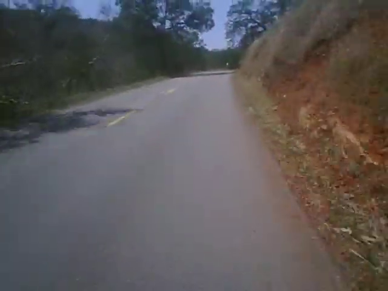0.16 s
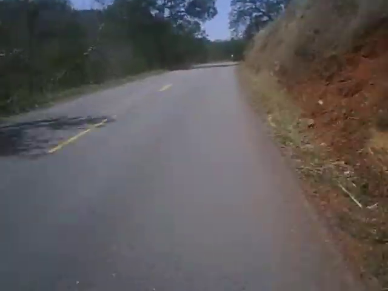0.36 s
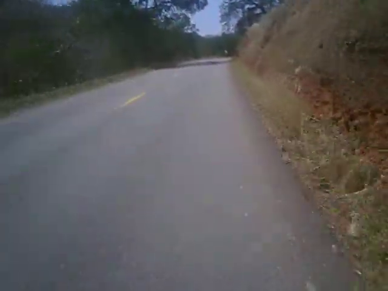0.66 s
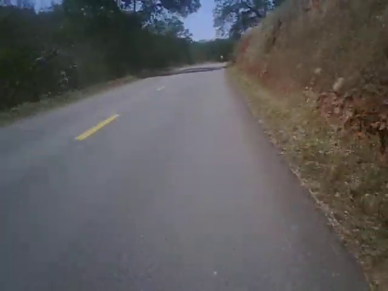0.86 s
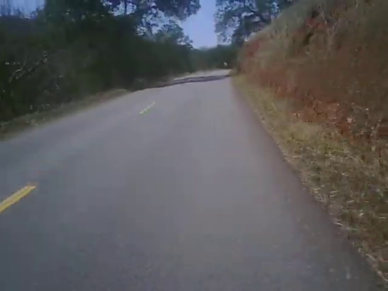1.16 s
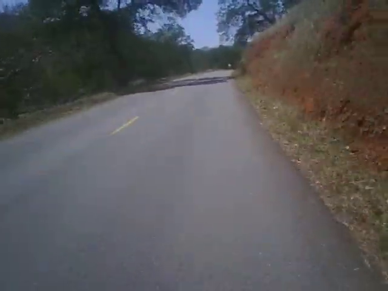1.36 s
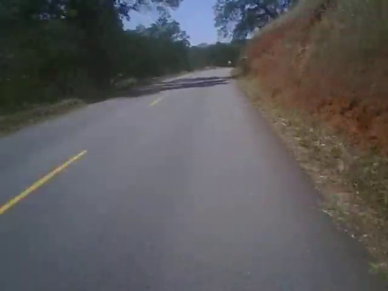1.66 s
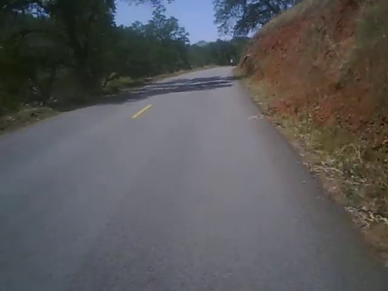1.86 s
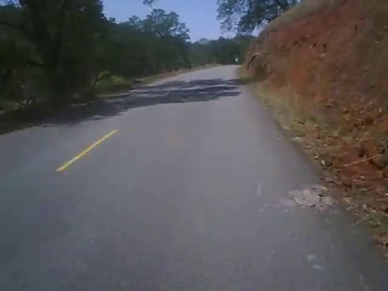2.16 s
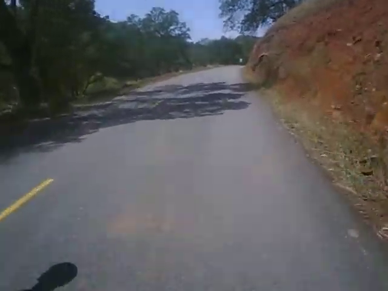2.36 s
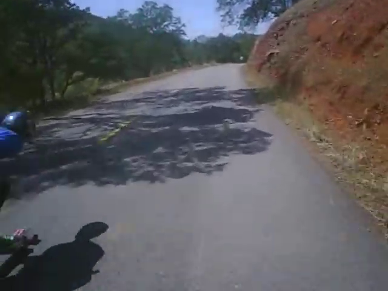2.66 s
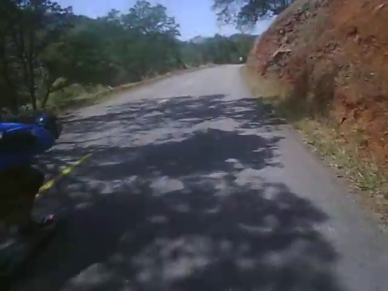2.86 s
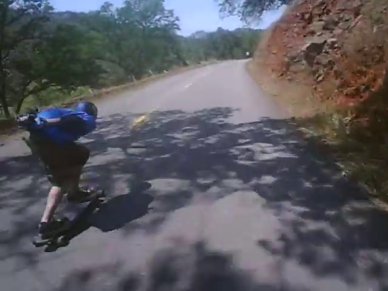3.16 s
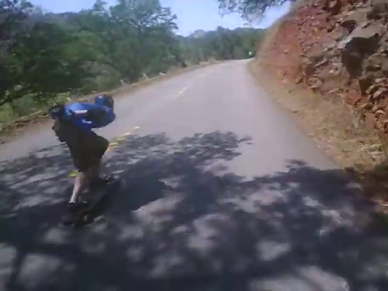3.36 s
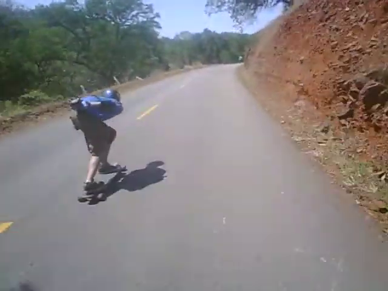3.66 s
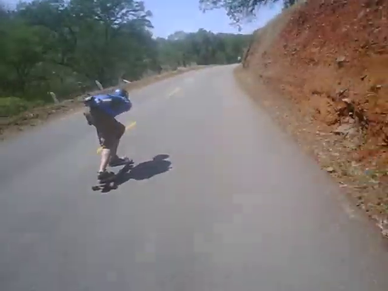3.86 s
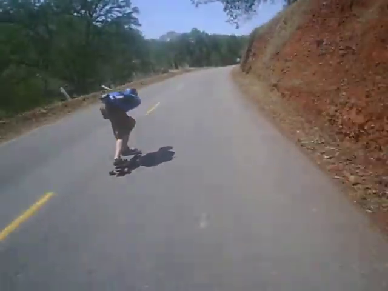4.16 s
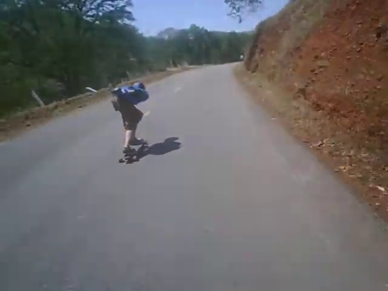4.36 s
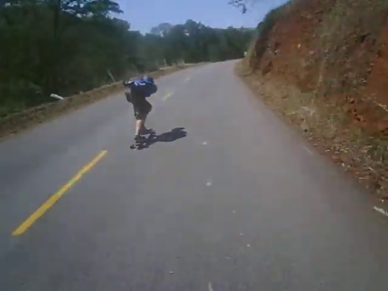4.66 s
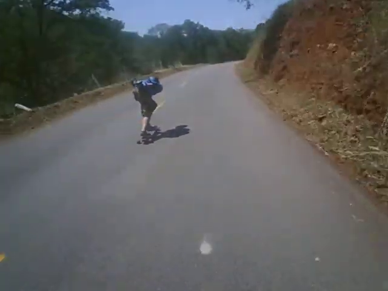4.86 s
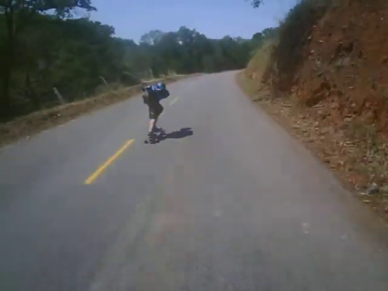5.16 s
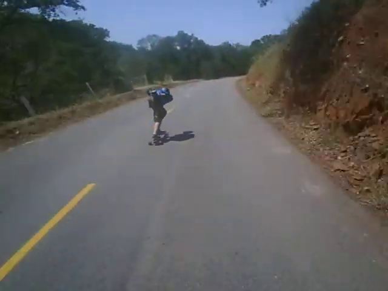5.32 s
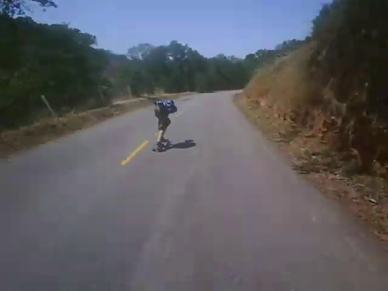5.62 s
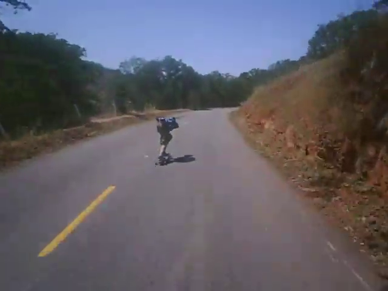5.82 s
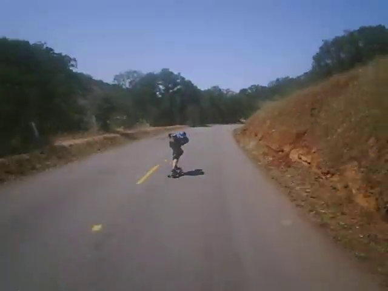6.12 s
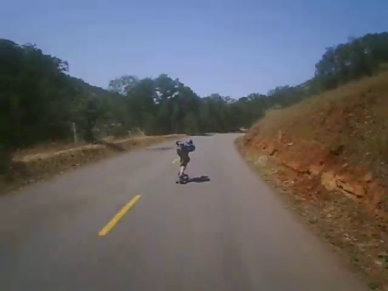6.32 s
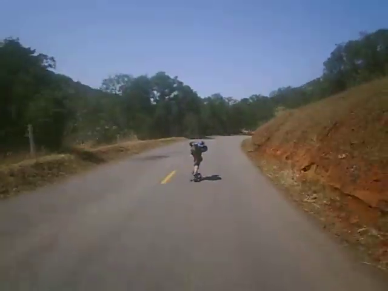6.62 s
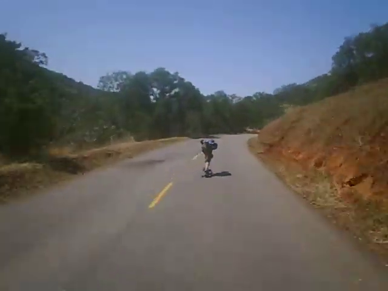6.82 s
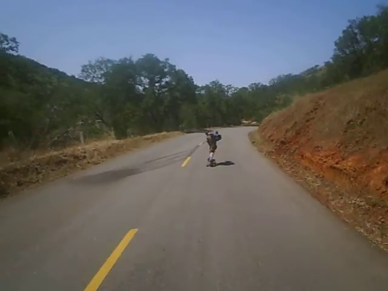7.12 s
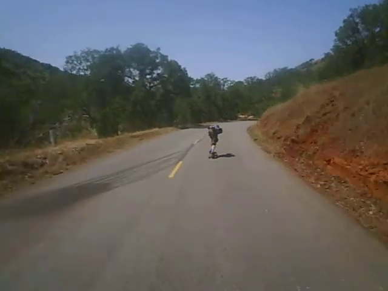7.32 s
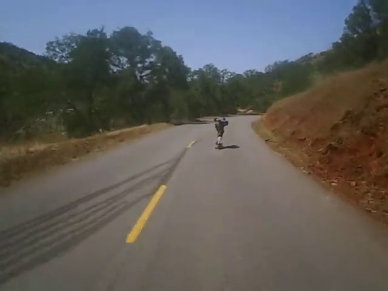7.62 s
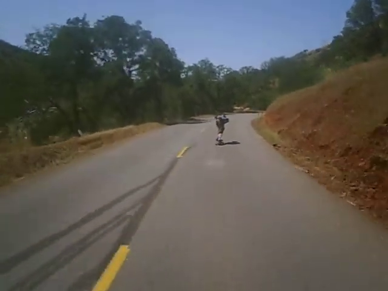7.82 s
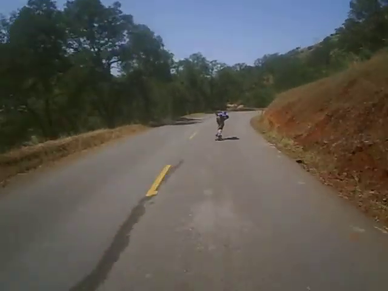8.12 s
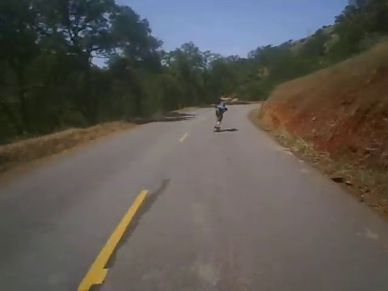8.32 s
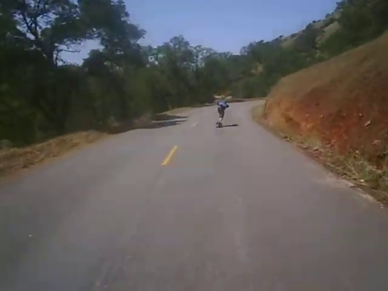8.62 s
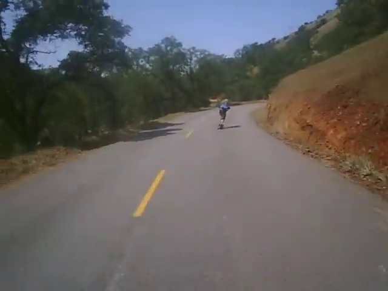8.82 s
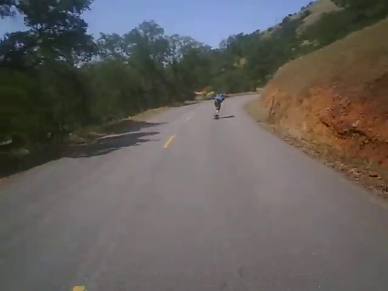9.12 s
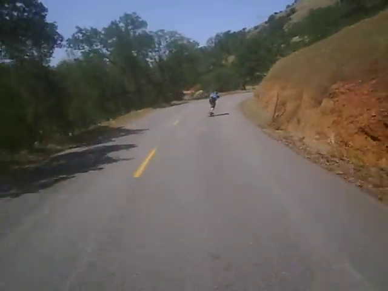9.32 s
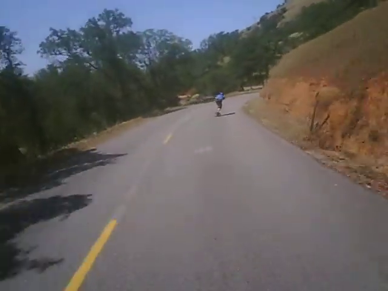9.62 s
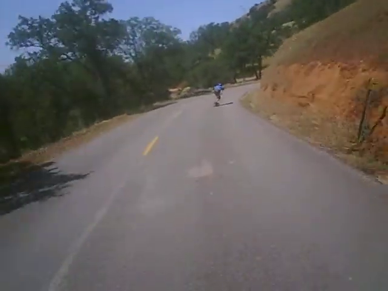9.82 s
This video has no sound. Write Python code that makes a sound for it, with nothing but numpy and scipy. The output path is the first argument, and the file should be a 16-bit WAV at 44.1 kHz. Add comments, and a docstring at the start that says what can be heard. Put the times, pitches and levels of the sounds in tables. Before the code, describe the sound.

Harsh rolling roar of skateboard wheels on a coarse road, wind rumbling underneath, a faint passing hiss, sudden swells, then fading amid electronic ticks.

```python
"""A longboard rolls on rough asphalt, heard by a small camera: stones shake wheels, deck and trucks (shaped noise)
while wind rumbles. The roar swells in the first half second and sinks by 3 s; a second board hisses past at 2.6 s.
The roar leaps at 3.6 s, grit peaks near 6 s, the roar jumps again at 7.7 s, then sinks to the end.
Throughout, the camera adds self-noise, whistles, a frame-rate buzz and ticks at its buffer seams."""
import sys
import numpy as np
from scipy import signal
from scipy.fft import rfft, irfft, next_fast_len
from scipy.io import wavfile
from scipy.ndimage import uniform_filter1d, map_coordinates

SR = 44100
rng = np.random.default_rng(int(sys.argv[2]) if len(sys.argv) > 2 else 0)


def file_out(sig):
    """Save sig as 16-bit WAV at sys.argv[1]."""
    # one column per channel
    cols = np.atleast_2d(sig).T
    # limit, then scale
    lim = np.clip(cols, -1, 1)
    pcm = np.round(lim * 32767).astype(np.int16)
    wavfile.write(sys.argv[1], SR, pcm)


N = 440118

# rolling levels before the fine wobble: (time [s], wheel roar [dB], grit [dB], airy hiss [dB])
RIDE_LEVELS = [(0, -24, -41, -45), (.16, -20, -38, -42), (.33, -17.5, -33.5, -39), (.5, -18, -36, -41),
               (1.05, -18, -34, -40), (1.25, -21.5, -39.5, -43.5), (1.6, -21, -40, -44.5),
               (1.75, -23.5, -42.5, -43.5), (2.6, -25.5, -44.5, -44.5), (3.25, -26.5, -44.5, -47.5),
               (3.56, -21, -39, -42.5), (3.575, -19, -35, -40), (3.68, -16, -33, -39.5),
               (3.85, -17, -32.5, -39), (4.2, -16, -35, -40), (4.7, -18.5, -37.5, -42),
               (5.15, -17.5, -35, -41), (5.3, -20.5, -36.5, -42), (5.5, -17.5, -34, -39.5),
               (5.85, -16, -30, -35.5), (6.45, -15.5, -29.5, -35.5), (6.55, -18, -33, -36),
               (6.75, -17.5, -33.5, -37.5), (7.05, -18.5, -33.5, -40), (7.35, -20, -37.5, -42),
               (7.63, -22, -38, -43), (7.67, -18, -33.5, -37.5), (7.85, -19.5, -38, -41.5),
               (8.06, -21.5, -40, -45.5), (9.1, -24.5, -42.5, -46), (9.2, -23, -41, -46.5),
               (9.4, -24, -45, -48.5), (9.98, -26, -45, -47)]
# low levels: (time [s], deck hum [dB], truck drone [dB], wind [dB])
LOW_LEVELS = [(0, -25.5, -26, -27.5), (.44, -30.5, -24.5, -26), (1.66, -29.5, -27, -28),
              (2.36, -27.5, -32, -32), (2.67, -30.5, -32, -33.5), (3.14, -29.5, -32.5, -32),
              (3.55, -32.5, -28.5, -28), (3.6, -27, -23, -25), (4.1, -29.5, -23.5, -26),
              (5.09, -29.5, -23, -28), (5.4, -36, -23.5, -26), (6, -24, -20.5, -21.5),
              (6.75, -24.5, -24, -23.5), (7.5, -25.5, -26.5, -25.5), (8.26, -32, -28.5, -27),
              (8.84, -28.5, -29.5, -26), (9.5, -31.5, -31, -29), (9.98, -27, -33.5, -30)]
# resonances excited by the road: (centre [Hz], width [Hz], relative level [dB])
HUM_MODES = [(297.5, 25, 6)]
DRONE_MODES = [(621.6, 36.6, -1.5), (680, 23, -8)]
ROAR_MODES = [(386, 55, -8), (518, 104, -14), (828, 260, -15), (962.5, 48, -12.5), (1195, 195, -12.5),
              (1454, 180, -4.5), (1722, 107, -4), (1865, 113, -2), (1973, 145, -1.5), (2146, 99, -8.5)]
RASP_MODES = [(2874, 420, -4), (3270, 260, 2), (3840, 264, 0.5), (4200, 400, -7)]
GRIT_MODES = [(4660, 1200, 0), (5280, 890, 0.5), (6600, 1200, -8.5)]
HISS_MODES = [(8930, 770, 1), (9880, 770, 5), (11270, 1300, 3), (12900, 500, -6), (13900, 800, -10),
              (15000, 810, -10)]
# bands of the second board's hiss: (centre [Hz], width [Hz], relative level [dB])
FAR_HISS_MODES = [(7000, 600, 2), (8550, 600, 5), (9800, 600, -1), (11200, 900, -12)]
# wind spectrum: (frequency [Hz], relative density [dB per Hz])
WIND_SPECTRUM = [(15, -18), (30, 4), (100, 2), (250, 3), (500, -14), (1000, -15.5), (2500, -26),
                 (6000, -75)]
# steady clock leakage: (frequency [Hz], level [dB rms])
WHISTLE_TONES = [(10000, -59), (15306, -58), (15336, -71), (15366, -75)]
# loud seam ticks: (time [s], jump before clipping [dB], direction [sign], width [samples])
LOUD_TICKS = [(.159, -11, 1, 2), (.2257, -7, -1, 2), (.659, -10, -1, 2), (.8257, -1, 1, 2),
              (.9924, -4, -1, 2), (1.0924, -6, 1, 2), (1.359, -8, 1, 2), (3.3257, -3.5, 1, 2),
              (3.4924, -1, 1, 4), (3.5924, -21, 1, 2), (4.2924, -10, -1, 4), (5.0924, -4, -1, 4),
              (5.2257, -3, 1, 2), (5.4924, -13, -1, 2), (5.6257, 2, -1, 4), (6.0257, -5, -1, 2),
              (6.3924, -5, -1, 2), (6.9257, -10, -1, 2), (7.459, -13, -1, 2), (8.6924, -10, -1, 4),
              (9.2257, -12, -1, 4), (9.359, -5, 1, 2), (9.6257, -16, -1, 2)]

RASP_OVER_ROAR_DB, RASP_SWING_DB_PER_DB = -8, 0.88  # swing: per dB of the roar's
AIRY_OVER_HISS_DB, AIRY_SWING_DB_PER_DB = -4, 1.3  # upper hiss bands against the lower
SELF_NOISE_DB = -57  # before the band limit
FRAME_HZ, FIRST_SEAM_S = 30, .0257
STALE_SHARE, STALE_CHANCE = 0.58, 0.18  # faint ticks: share of old signal, chance at a seam
ABREAST_S, NEAREST_DB = 2.57, -47  # second board
APPROACH_S, LEAVE_S = 0.97, 0.65  # time to gain one nearest distance
TOP_HZ = 15780


def amp(db):
    """Gain of a dB value."""
    return 10 ** (np.asarray(db) / 20)


def unit(x):
    """x at rms 1."""
    return x / np.sqrt(np.mean(x ** 2))


def curves(rows):
    """One value per sample for each column after the time."""
    time_s, *columns = np.transpose(rows)
    return [np.interp(np.arange(N) / SR, time_s, column) for column in columns]


def wobble(knots_hz):
    """Smooth random curve through knots_hz knots a second."""
    knots = rng.standard_normal(int(N * knots_hz / SR) + 4)
    return map_coordinates(knots, [np.arange(N) * knots_hz / SR])


def swung(level_db, offset_db, swing):
    """Level curve with its mean offset and its swing about the mean scaled."""
    mean_db = level_db.mean()
    return mean_db + offset_db + swing * (level_db - mean_db)


def filtered(x, response):
    """x times a response of frequency."""
    m = next_fast_len(N + 8192)
    return irfft(rfft(x, m) * response(np.fft.rfftfreq(m, 1 / SR)), m)[:N]


def ringing(modes, steep):
    """Gain of unrelated resonances whose powers add; steep darkens the flanks."""
    def resonance_power(f, centre_hz, width_hz):
        damping = (f * width_hz) ** 2
        return damping / ((centre_hz ** 2 - f * f) ** 2 + damping)

    def gain(f):
        return np.sqrt(sum(amp(db) ** 2 * resonance_power(f, hz, width_hz) ** steep
                           for hz, width_hz, db in modes))
    return gain


def road(modes, steep, bumpy_db, patchy_db=0):
    """Countless stones: noise swelling with the surface, in time-frequency patches, ringing in the modes."""
    spectrum = signal.stft(rng.standard_normal(N), nperseg=512)[2]
    patches = uniform_filter1d(rng.standard_normal(spectrum.shape), size=8, axis=0)  # over frequency
    patches = uniform_filter1d(patches, size=14, axis=1)  # over time
    stones = signal.istft(spectrum * amp(patchy_db * unit(patches)), nperseg=512)[1][:N]
    bumps = amp(bumpy_db * (wobble(13) + wobble(60)))
    return unit(filtered(stones * bumps, ringing(modes, steep)))


def deck_hum(hum_db):
    """Low resonance of the deck, driven by the road."""
    return amp(hum_db) * road(HUM_MODES, steep=1.38, bumpy_db=-0.2)


def truck_drone(drone_db):
    """Resonances of the trucks, driven by the road."""
    return amp(drone_db) * road(DRONE_MODES, steep=1.0, bumpy_db=0.16)


def wheel_roar(roar_db):
    """Shaken wheels ringing through deck and trucks."""
    return amp(roar_db) * road(ROAR_MODES, steep=1.386, bumpy_db=0.37, patchy_db=0.1)


def wheel_rasp(roar_db):
    """Higher road-driven resonances that follow the roar with less swing."""
    rasp_db = swung(roar_db, RASP_OVER_ROAR_DB, RASP_SWING_DB_PER_DB)
    return amp(rasp_db) * road(RASP_MODES, steep=1.34, bumpy_db=0.46, patchy_db=0.4)


def grit_noise(grit_db):
    """Grit under the wheels: patchy noise in bands above the rasp."""
    return amp(grit_db) * road(GRIT_MODES, steep=1.86, bumpy_db=0.27, patchy_db=1.2)


def airy_hiss(hiss_db):
    """Top rolling noise in two groups of bands; the upper swings more."""
    airy_db = swung(hiss_db, AIRY_OVER_HISS_DB, AIRY_SWING_DB_PER_DB)
    lower = amp(hiss_db) * road(HISS_MODES[:2], steep=1.2, bumpy_db=0.66, patchy_db=0.3)
    upper = amp(airy_db) * road(HISS_MODES[2:], steep=1.6, bumpy_db=0.7, patchy_db=0.3)
    return lower + upper


def board():
    """Rolling board: all road-driven layers; roar, rasp, grit and hiss share one wobble."""
    roar_db, grit_db, hiss_db = curves(RIDE_LEVELS) + 0.61 * wobble(7)
    hum_db, drone_db, _ = curves(LOW_LEVELS)
    low = deck_hum(hum_db) + truck_drone(drone_db)
    middle = wheel_roar(roar_db) + wheel_rasp(roar_db)
    return low + middle + grit_noise(grit_db) + airy_hiss(hiss_db)


def wind():
    """Turbulence at the microphone port: a broad, gusty rumble."""
    hz, db = np.transpose(WIND_SPECTRUM)
    air = filtered(rng.standard_normal(N), lambda f: amp(np.interp(np.log(f + 1), np.log(hz), db)))
    gusts = amp(1.3 * wobble(4.9))
    return amp(curves(LOW_LEVELS)[2]) * unit(air * gusts)


def frame_buzz():
    """The supply sags once a frame, holds, then recovers exponentially."""
    hold_s, recovery_s = .0045, .0025
    since_s = (np.arange(N) / SR - FIRST_SEAM_S - .0135) % (1 / FRAME_HZ)
    sag = np.where(since_s < hold_s, 1, np.exp(-(since_s - hold_s) / recovery_s))
    return -amp(-31 + 3 * wobble(4)) * uniform_filter1d(sag - sag.mean(), size=40)


def whistles():
    """Clocks leak in as steady sines."""
    t_s = np.arange(N) / SR
    return sum(amp(db) * np.sqrt(2) * np.sin(2 * np.pi * hz * t_s) for hz, db in WHISTLE_TONES)


def electronics():
    """Buzz and whistles over white self-noise."""
    return frame_buzz() + amp(SELF_NOISE_DB) * rng.standard_normal(N) + whistles()


def seams(x):
    """Buffer seams: at random ones two samples are partly a frame old; at listed ones samples jump."""
    out = x.copy()
    frame, first = round(SR / FRAME_HZ), round(FIRST_SEAM_S * SR)
    at = np.arange(first + frame, N - frame, frame)
    at = at[rng.random(len(at)) < STALE_CHANCE][:, None] + np.arange(2)
    out[at] += STALE_SHARE * (x[at - frame] - x[at])
    for time_s, db, direction, samples in LOUD_TICKS:
        width = round(samples)
        seam = first + frame * round((time_s - FIRST_SEAM_S) * FRAME_HZ)
        start = seam + 1 - width // 2
        out[start:start + width] += np.sign(direction) * amp(db)
    return np.clip(out, -.7, .7)  # the converter's range


def passer():
    """The overtaking board: a thin hiss that falls with the square of its distance."""
    since_s = np.arange(N) / SR - ABREAST_S
    ahead = since_s / np.where(since_s < 0, APPROACH_S, LEAVE_S)  # in nearest distances
    hiss = road(FAR_HISS_MODES, steep=1.3, bumpy_db=0.4, patchy_db=0.4)
    return amp(NEAREST_DB) / (1 + ahead ** 2) * hiss


def scene():
    """Both boards and the wind at one microphone."""
    return (board() + wind() + passer())[None]


def record(dry):
    """Electronics leak in, the loudest peaks clip softly, seams tick, a band limit cuts the top."""
    x = dry[0] + electronics()
    x = x / (1 + abs(x / .74) ** 12) ** (1 / 12)
    return filtered(seams(x), lambda hz: hz < TOP_HZ)[None]


dry = scene()
out = record(dry)
file_out(out)
```